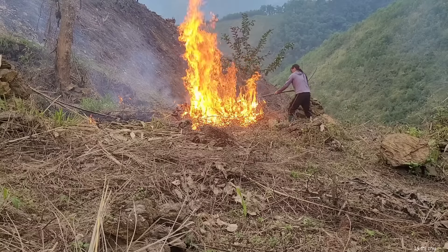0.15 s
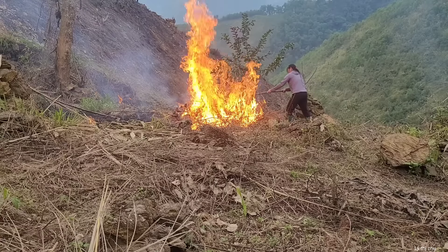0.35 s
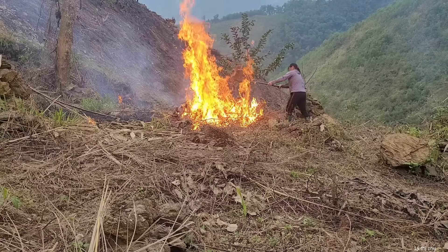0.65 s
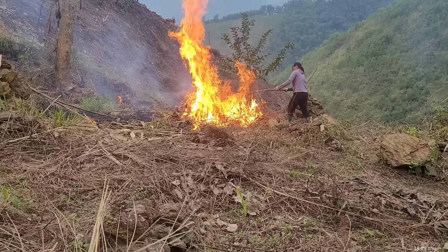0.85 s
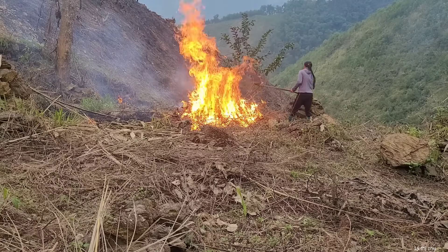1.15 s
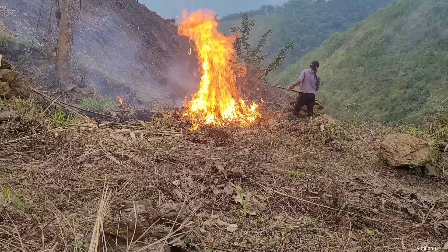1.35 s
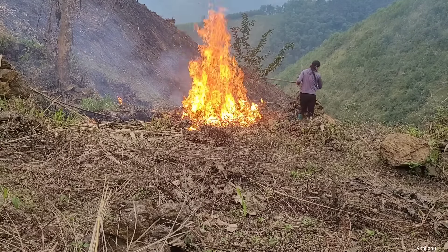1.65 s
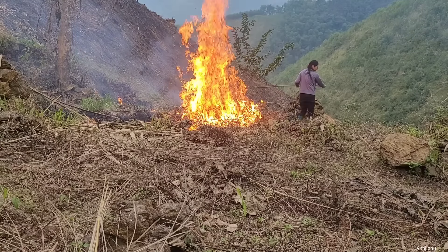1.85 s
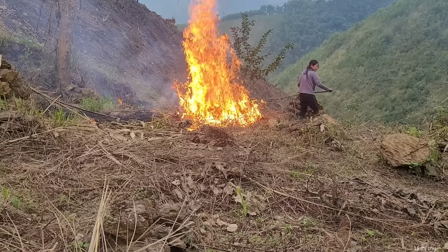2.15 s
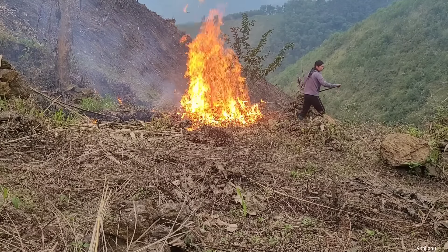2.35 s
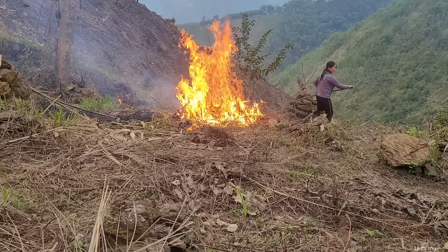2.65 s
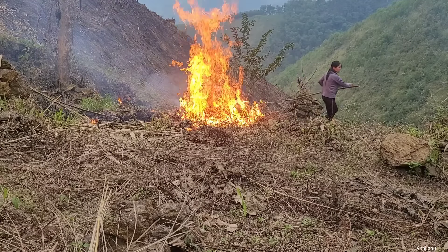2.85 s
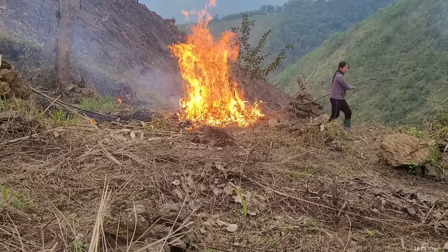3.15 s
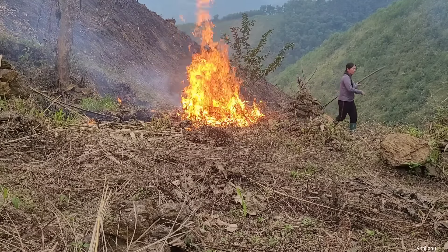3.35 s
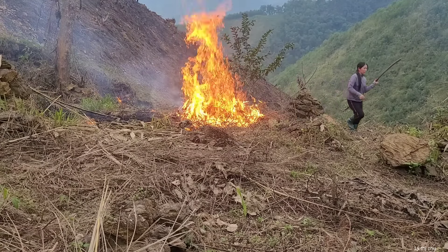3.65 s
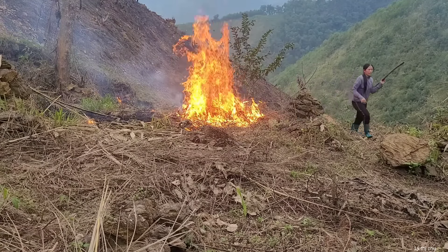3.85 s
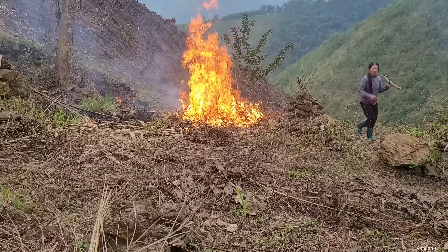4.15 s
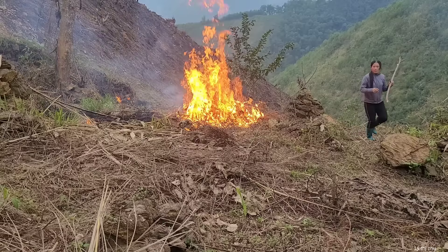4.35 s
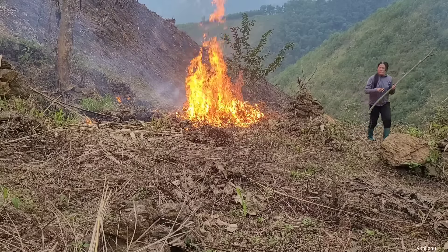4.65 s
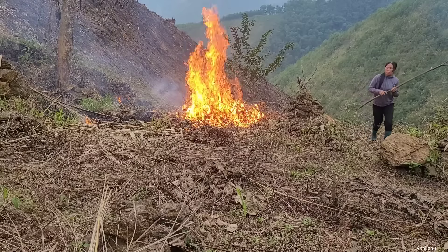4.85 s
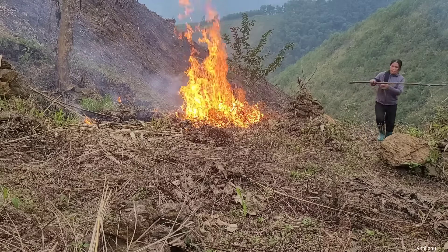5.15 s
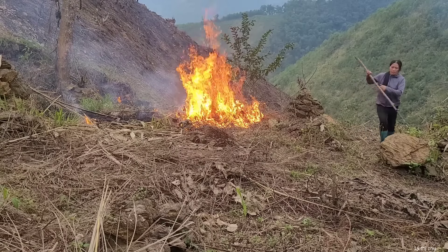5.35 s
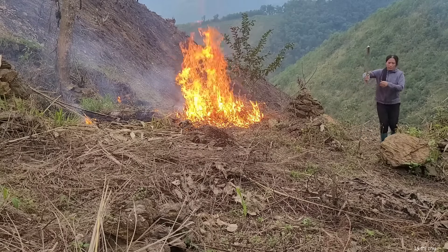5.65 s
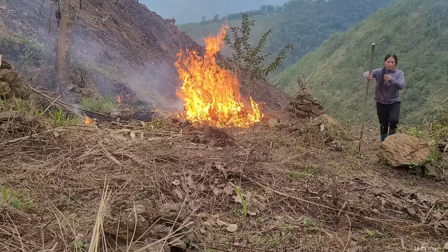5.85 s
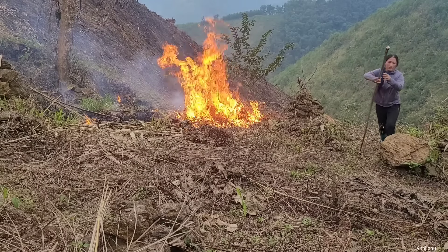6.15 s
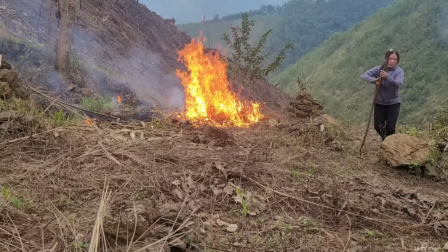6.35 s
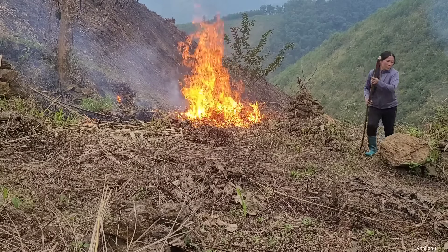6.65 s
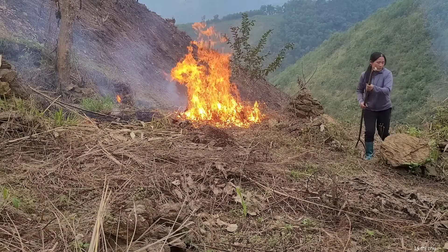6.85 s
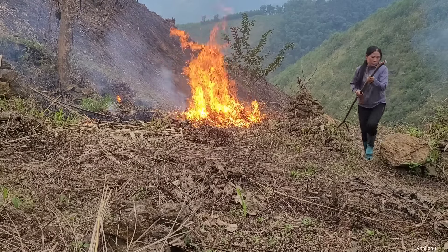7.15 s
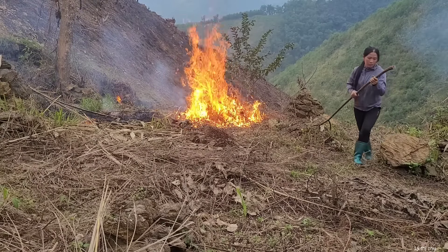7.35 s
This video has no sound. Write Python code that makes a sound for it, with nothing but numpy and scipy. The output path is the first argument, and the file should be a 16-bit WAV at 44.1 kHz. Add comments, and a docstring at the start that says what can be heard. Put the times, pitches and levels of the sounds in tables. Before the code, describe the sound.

A heap of dry grass and brush burns on an open hillside, a few metres from a stereo microphone. Fine crackling and small twig snaps run throughout over a soft hiss and a low flame rumble. Three faint, thin whistles sound at the start. Stalks burst in sharp, irregular pops with a brief echo, a loud cluster coming early, another midway, and the loudest single pop near the end.

```python
"""Brush fire on a hillside

A heap of dry grass and brush burns in the open, a few metres ahead of a phone's stereo microphone.
Stalks burst in sharp pops that scatter in the litter and echo off the slope; twigs snap more softly.
Under them lie a fine crackle of grass, a hiss of steam and the low rumble of the flames.
A thin whistle sounds three times at the start."""
import sys
import numpy as np
from scipy import signal
from scipy.fft import rfft, irfft
from scipy.io import wavfile
from scipy.ndimage import uniform_filter1d

SR = 44100
rng = np.random.default_rng(int(sys.argv[2]) if len(sys.argv) > 2 else 0)


def log_audio(samples):
    """Write samples as a 16-bit WAV file to the path given in sys.argv[1]."""
    # one column per channel
    frames = np.atleast_2d(samples).T
    # limit to full scale, then quantise
    limited = np.clip(frames, -1, 1)
    pcm = np.round(limited * 32767).astype(np.int16)
    wavfile.write(sys.argv[1], SR, pcm)


N = 330750
T = np.arange(N) / SR

# swell of the flames: (time [s], level [dB])
FLAME_LEVEL = [(0.0, -48.5), (0.9, -44.5), (1.2, -50.5), (1.65, -44), (3.15, -52.5), (3.9, -48.5),
               (4.05, -50), (4.2, -45.5), (4.35, -60), (4.5, -49.4), (5.55, -53), (5.7, -48), (6.45, -51.5),
               (6.75, -53), (7.05, -49), (7.5, -50.8)]
# deep billowing of hot gas: (frequency [Hz], relative level [dB])
RUMBLE_SPECTRUM = [(20, -32), (35, -12), (52, 1), (65, 2), (85, -1.5), (160, -8.5), (400, -35.5)]
# flutter of the tongues of flame: (frequency [Hz], relative level [dB])
ROAR_SPECTRUM = [(70, -22.5), (150, 0.5), (250, -1.5), (560, -12), (1300, -25), (3000, -18)]
# liveliness of the blaze, which drives hiss, crackle and twigs: (time [s], level [dB])
BLAZE_ACTIVITY = [(0.0, -51), (0.1, -44.5), (1.0, -48.5), (1.15, -54.5), (1.3, -38), (1.45, -48.5),
                  (1.65, -40), (2.4, -47.6), (3.1, -41), (3.25, -49.0), (3.95, -43.5), (4.25, -48.5),
                  (4.35, -43), (4.95, -49), (6.05, -44.5), (6.4, -52.5), (6.45, -46), (7.5, -49)]
# steam and the finest crackle: (frequency [Hz], relative level [dB])
HISS_SPECTRUM = [(400, 1.5), (1100, -3.5), (2200, -2), (4400, -5), (15500, 4.5)]
# the loudest bursting stalks: (time [s], ring pitch [Hz], ring Q [-], ring level [dB],
# thump level [dB], snap level [dB], lag of the left channel [ms], echo level [dB])
STALK_POPS = [(0.1402, 2130, 0.21, -4, 8, -7, 0, -9.0), (0.4744, 720, 0.35, -5.5, -1, -7.0, -0.026, -9),
              (0.6797, 2230, 0.27, 0, 3.5, -28, -0.53, -17), (0.9635, 4010, 0.17, -6, -6, -12, 0, -5),
              (1.2654, 3840, 0.3, -11, -17, -1.5, -0.023, -23),
              (1.3255, 3170, 0.35, 12.5, 1.5, -10, 0, -13.5), (1.5084, 825, 0.54, -16, -14, -5, 0, -21),
              (1.6562, 1520, 0.76, 21, 12, -3.5, 0, -14.0), (1.7029, 2800, 0.41, 1.0, 1, -5.5, 0, -7),
              (1.7072, 4400, 0.74, 4, -6, -10, 0, -18), (1.7325, 1240, 0.34, 12.0, 4, -2.0, 0.025, -16),
              (1.915, 3050, 0.61, 16, 10.5, -4, 0, -14), (2.1121, 4300, 0.46, -6, 1, -23, -0.027, -10),
              (2.1577, 870, 0.74, -10, -21, -1, 0, -24), (2.1802, 1530, 0.95, -11, -8.5, -1.5, 0.12, -4),
              (2.3287, 3100, 0.28, -8, 1.5, -8, 0.45, -26), (2.4765, 1860, 1.82, -5, -4, 5.5, 0.14, -17),
              (2.6647, 1770, 0.88, -14, -16, -2, 0.046, -24), (2.7967, 1530, 0.27, 4.5, 1.5, -7, 0, -17),
              (3.0773, 1580, 0.18, -0.5, 3, 3, 0, -6), (3.1663, 3120, 1.1, -13, -8, 2.5, 0, -16),
              (3.5573, 4620, 0.61, -4, -2, -16, -0.47, -5.5), (3.7931, 3030, 0.75, 3, -5.5, -8.5, 0, -17),
              (3.8879, 2580, 0.88, 18.5, 15.5, 6.5, 0, -11), (3.9545, 1810, 0.77, -7, -7, 2.5, 0, -19),
              (4.0604, 1550, 0.27, 9, 10, 2, -0.35, -16.0), (4.3301, 4520, 0.35, 4.5, -4, 11.5, 0, -21),
              (4.6487, 900, 1.3, -0.5, 0, -11, -0.55, -14), (4.8119, 1730, 1.9, -6, -10, -2.5, -0.35, -7),
              (5.1968, 1000, 1, 8.5, 11, -7.5, -0.35, -14.5),
              (5.2353, 1860, 1.28, -14, -13, -0.5, -0.27, -11),
              (5.3704, 4500, 0.97, 2.5, -0.5, -11, 0, -19), (5.8004, 1210, 0.65, 10.5, 10, -3, -0.34, -12),
              (5.869, 1730, 2, -3, -7, -5.5, 0.078, -17), (6.0354, 1560, 0.33, -3, -9, 8, -0.0079, -10.5),
              (6.043, 2320, 0.41, 12, -4, -22, -0.49, -19.5), (6.4468, 930, 1.6, 25, 25.5, 2, -0.52, -15.5),
              (6.639, 645, 0.6, -2.5, 5, -15, 0.034, -9.5), (6.7448, 1010, 0.57, -9, -27, -1.5, 0, -6),
              (7.0042, 2060, 0.62, 3, -7, -26, 0, -17), (7.029, 4370, 0.5, -1, 0.5, -4, -0.14, -10),
              (7.2563, 754, 0.3, -2.5, -4, -4.5, 0, -15), (7.3159, 805, 0.26, -2, -6, 1.0, -0.25, -11.0)]
# what the brush on the slope sends back: (frequency [Hz], gain [dB])
SLOPE_ECHO = [(150, -1.5), (450, 5.5), (1100, -3.5), (2500, 3.5), (5000, 4), (15000, 0)]
# thin whistles: (start time [s], top pitch [Hz], level [dB])
WHISTLE_NOTES = [(.23, 8750, -53), (.39, 9000, -55), (.57, 8350, -53)]
# response of the phone's microphone: (frequency [Hz], gain [dB])
MIC_RESPONSE = [(150, 0), (250, 4.5), (380, -3), (560, 5), (830, -2), (1100, 2), (1350, -1), (4800, 1),
                (6100, -2), (7400, 1.5), (9000, -2.5), (15000, 0.5)]


def undb(db):
    """Decibels to gain."""
    return 10 ** (np.asarray(db) / 20)


def unit(x):
    """Scale to rms 1."""
    return x / np.sqrt(np.mean(x ** 2))


def curve(table):
    """A (time, level) table, sample by sample."""
    return np.interp(T, *np.transpose(table))


def contour(points, f):
    """Gain at each frequency from (Hz, dB) points."""
    hz, db = np.transpose(points)
    return undb(np.interp(np.log(f), np.log(hz), db))


def causal(gain):
    """The most abrupt pulse that has these gains, as a spectrum."""
    cepstrum = irfft(np.log(gain + 1e-5))
    half = cepstrum.shape[-1] // 2
    cepstrum[..., 1:half] *= 2
    cepstrum[..., half + 1:] = 0
    return np.exp(rfft(cepstrum))


def colour(x, points, size=8192):
    """Filter by a spectrum of (Hz, dB) points."""
    f = np.fft.rfftfreq(size, 1 / SR) + 1
    response = irfft(causal(contour(points, f)))
    return signal.fftconvolve(x, response[None], axes=-1)[:, :N]


def resonance(f, hz, q):
    """Gain of a band-pass applied twice."""
    return 1 / (1 + q ** 2 * (f / hz - hz / f) ** 2)


def walk(rate):
    """Random levels held 1 / rate s and smoothed twice; rms 1."""
    hold = int(SR / rate)
    steps = np.repeat(rng.standard_normal(N // hold + 1), hold)
    return unit(uniform_filter1d(uniform_filter1d(steps, hold), hold)[:N])


def stereo_noise(side_db):
    """Noise common to both channels plus a part that differs."""
    mid, side = rng.standard_normal((2, N))
    return mid + undb(side_db) * np.array([side, -side])


def decaying_noise(envelope, count):
    """A burst of noise of about unit energy for each event."""
    return rng.standard_normal((count, len(envelope))) * envelope / np.linalg.norm(envelope)


def flames(level_db, roar_db=-53.5, flutter_db=3.0):
    """Hot gas billows in a deep rumble, and the tongues of flame flutter above it."""
    swell_db = level_db - level_db.mean()
    rumble = unit(colour(stereo_noise(side_db=-13), RUMBLE_SPECTRUM)) * undb(level_db - 2.5)
    roar = unit(colour(stereo_noise(side_db=-19.5), ROAR_SPECTRUM)) * undb(roar_db + 0.11 * swell_db)
    return (rumble + roar) * undb(flutter_db * walk(rate=25))


def hiss(level_db, grain_db=5.5, flicker_db=1.5):
    """Steam and the finest crackle merge into a wide, grainy, flickering hiss."""
    grains = undb(grain_db * np.clip(walk(rate=900), -2, 2))
    steam = unit(colour(stereo_noise(side_db=-0.18) * grains, HISS_SPECTRUM))
    return steam * undb(level_db + flicker_db * walk(rate=49))


def bursts(rows, scatter_s, scatter_hz, size, snap_hz=9500, snap_q=0.48, echo_s=0.028):
    """Each break is one pressure pulse; the litter smears its treble and the slope returns a tail."""
    onset_s, hz, q, ring_db, thump_db, snap_db, lag_ms, echo_db = np.transpose(rows)[:, :, None]
    f, t = np.fft.rfftfreq(size, 1 / SR) + 1, np.arange(size) / SR
    # a stalk takes time to split, so its ring ends steeply above its own pitch
    ring = undb(ring_db) * resonance(f, hz, q) / np.sqrt(1 + (f / (2.3 * hz)) ** 8)
    thump = undb(thump_db) * resonance(f, hz=290, q=0.5)
    snap = undb(snap_db) * resonance(f, snap_hz, snap_q)
    pulse = causal(np.sqrt(ring ** 2 + thump ** 2 + snap ** 2))
    scattered = 0.62 * f ** 2 / (f ** 2 + scatter_hz ** 2)  # short waves scatter most
    echo_gain = undb(echo_db) * contour(SLOPE_ECHO, f)
    samples = (np.abs(onset_s * SR).astype(int) + np.arange(size)).ravel()
    channels = []
    for sign in (1, -1):  # left, right
        litter = rfft(decaying_noise(t ** 0.39 * np.exp(-t / scatter_s), len(rows)))
        slope = rfft(decaying_noise(np.exp(-t / echo_s) * (1 - np.exp(-t / 0.00077)), len(rows)))
        paths = np.sqrt(1 - scattered) + np.sqrt(scattered) * litter + echo_gain * slope
        delay = np.exp(-2j * np.pi * f * np.maximum(sign * lag_ms, 0) / 1000)
        channels.append(np.bincount(samples, irfft(pulse * delay * paths).ravel(), N)[:N])
    return np.array(channels)


def crackle(activity_db, count=1100, spread_db=7.0, ceiling_db=20, flurry_db=2.2):
    """Grass blades snap in flurries, mostly faint, thicker and louder as the blaze picks up."""
    moment, strength = rng.random((count, 2)).T
    pitch, ring, side, centred, snap_pitch = rng.standard_normal((count, 5)).T
    surge_db = activity_db - activity_db.mean()
    due = np.cumsum(undb(0.8 * surge_db + flurry_db * walk(rate=30)))
    onset_s = np.interp(moment, due / due[-1], T)
    db = ceiling_db * np.tanh(-spread_db * np.log(1 - strength) / ceiling_db)
    db += 0.5 * np.interp(onset_s, T, surge_db)
    ring_db, thump_db, snap_db = db - 26 + 3.5 * ring, db - 33, db - 25
    ring_hz, snap_hz = 3600 * np.exp(0.88 * pitch), 10000 * np.exp(0.5 * snap_pitch[:, None])
    lag_ms = np.where(centred > 0.2, 0, 0.275 * side)  # the heap is ahead, stray embers lie all round
    q, echo_db = np.full(count, 1.1), np.full(count, -20.0)
    rows = np.c_[onset_s, ring_hz, q, ring_db, thump_db, snap_db, lag_ms, echo_db]
    return bursts(rows, scatter_s=0.0025, scatter_hz=1950, size=1024, snap_hz=snap_hz, snap_q=0.81)


def twigs(activity_db, count=60, spread_db=3, ring_q=0.85, echo_db=-17):
    """Thin twigs snap all over the heap, at uneven moments and more often as the blaze picks up."""
    jitter = rng.random(count)
    variation = np.clip(rng.standard_normal((count, 5)), -1.7, 1.7)
    due = np.cumsum(undb(0.3 * activity_db))
    onset_s = np.interp((np.arange(count) + jitter) / count, due / due[-1], T)
    ring_hz = 2400 * np.exp(0.57 * variation[:, 0])
    levels_db = np.array([-13, -14, -9]) + spread_db * variation[:, 1:4]  # ring, thump, snap
    lag_ms = 0.272 * variation[:, 4]
    rows = np.c_[onset_s, ring_hz, np.full(count, ring_q), levels_db, lag_ms, np.full(count, echo_db)]
    return bursts(rows, scatter_s=0.0019, scatter_hz=4860, size=4096)


def stalks():
    """Thick stalks burst one by one, each with its own pitch, strength and place in the heap."""
    return bursts(STALK_POPS, scatter_s=0.0015, scatter_hz=4930, size=8192)


def ground_bounce(direct, delay_s=0.002802, bounce_db=-10, band_hz=(800, 3000)):
    """The midrange of each pop bounces off the soil and reaches the microphone a little later."""
    midrange = signal.sosfilt(signal.butter(1, band_hz, "band", fs=SR, output="sos"), direct)
    bounce = np.array([np.interp(T - delay_s, T, channel, left=0) for channel in midrange])
    return direct + undb(bounce_db) * bounce


def whistles(arch=0.083, waver=0.0051, length_s=0.13):
    """Faint high notes, dead centre, that rise and sag again."""
    notes, wobble = np.zeros(N), 1 + waver * walk(rate=150)
    for start_s, top_hz, db in WHISTLE_NOTES:
        progress = np.clip((T - start_s) / length_s, 0, 1)
        hz = top_hz * wobble * (1 - arch * (progress / 0.57 - 1) ** 2)
        envelope = np.sqrt(np.abs(np.sin(np.pi * progress)))
        notes += undb(db) * envelope * np.sin(2 * np.pi * np.cumsum(hz) / SR)
    return notes


def scene():
    """The heap from a few metres off: pops, snaps and crackle over hiss, flames and whistles."""
    activity_db = curve(BLAZE_ACTIVITY)
    burning = ground_bounce(stalks() + twigs(activity_db) + crackle(activity_db))
    return burning + hiss(activity_db - 2.5) + flames(curve(FLAME_LEVEL)) + whistles()


def record(dry):
    """The phone's microphone colours the sound, leans right, rounds loud pops and cuts the top."""
    ceiling, top_hz, balance_db = 1.2, 15500, [[-0.3], [0.3]]
    heard = colour(dry, MIC_RESPONSE) * undb(balance_db)
    rounded = ceiling * np.tanh(heard / ceiling)
    return signal.sosfilt(signal.ellip(8, 0.2, 70, top_hz, fs=SR, output="sos"), rounded)


dry = scene()
out = record(dry)
log_audio(out)
```